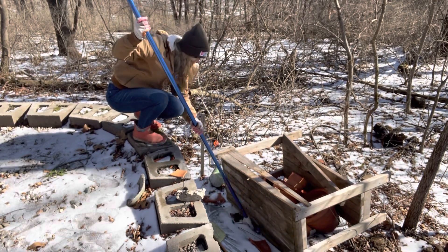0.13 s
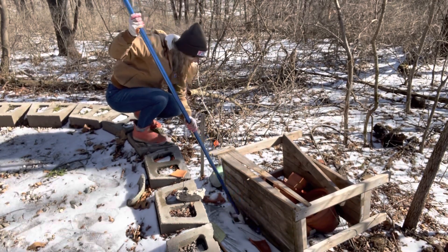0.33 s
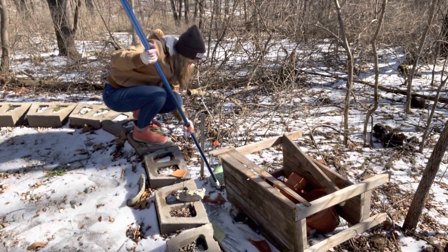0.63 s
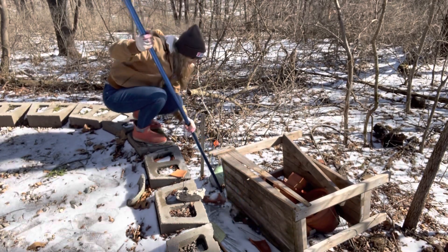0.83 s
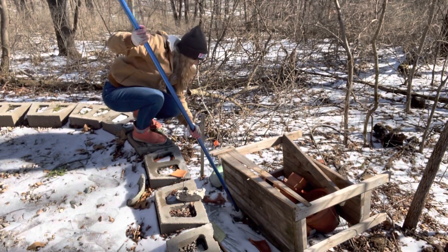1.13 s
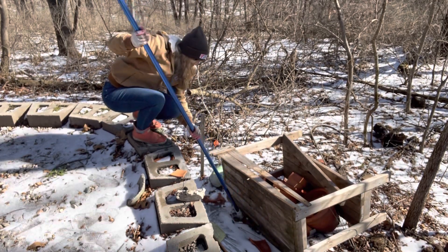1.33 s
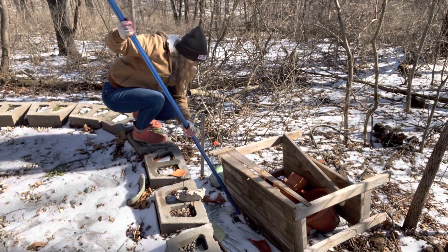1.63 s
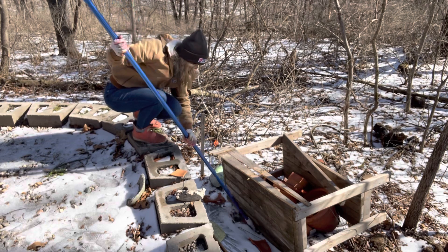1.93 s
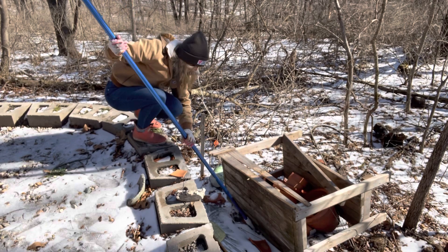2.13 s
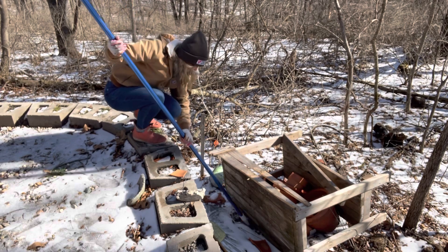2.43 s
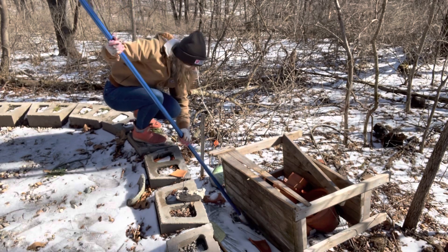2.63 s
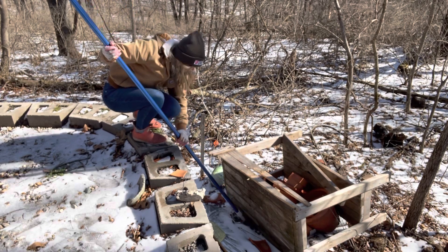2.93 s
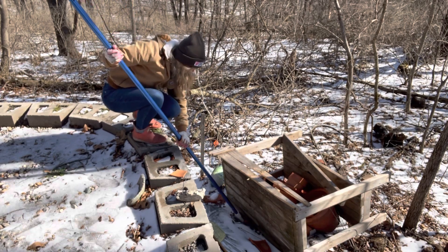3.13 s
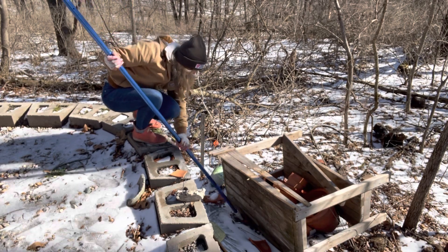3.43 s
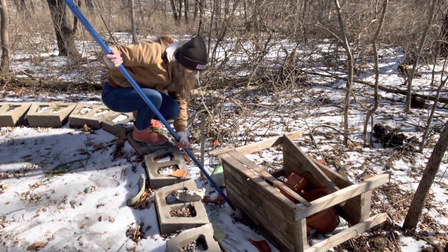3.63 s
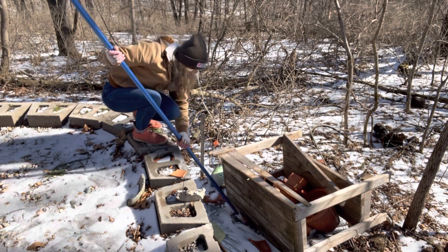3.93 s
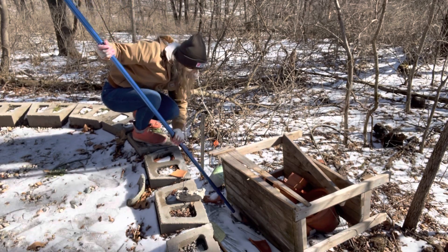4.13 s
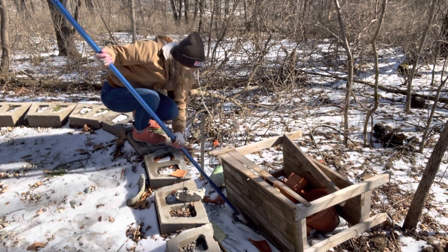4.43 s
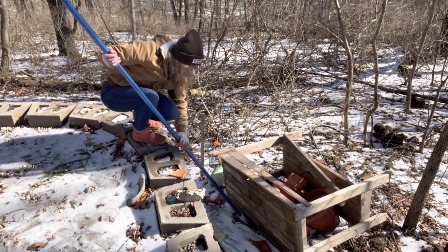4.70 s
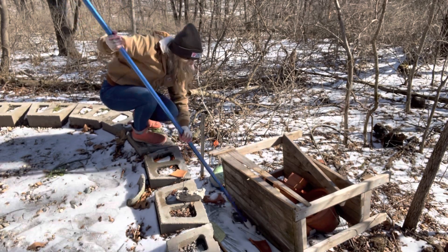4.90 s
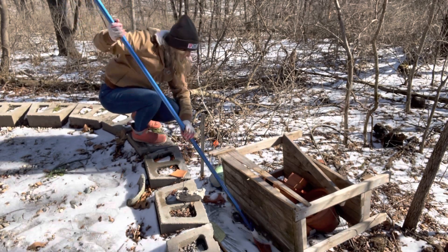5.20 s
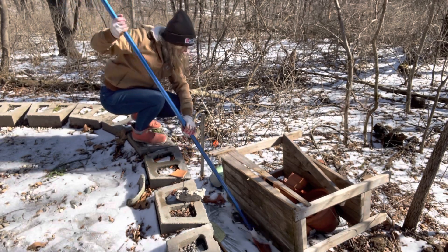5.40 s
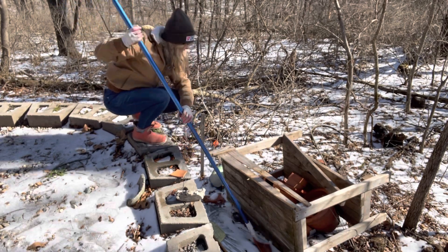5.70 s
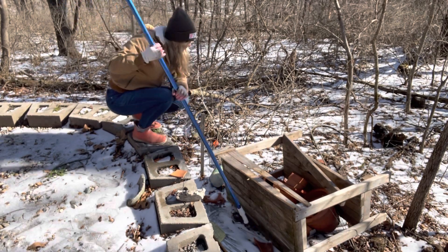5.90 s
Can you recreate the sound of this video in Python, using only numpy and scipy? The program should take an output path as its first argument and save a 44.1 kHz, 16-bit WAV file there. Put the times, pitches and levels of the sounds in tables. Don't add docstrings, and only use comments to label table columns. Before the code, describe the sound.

Terracotta pieces clatter, knock and tick as a long tube pokes them, with short crunchy scrapes, low wind rumble and occasional overloaded hits.

```python
import sys
import numpy as np
from scipy import signal
from scipy.fft import rfft, irfft, next_fast_len
from scipy.io import wavfile
from scipy.ndimage import uniform_filter1d

SR = 44100
rng = np.random.default_rng(int(sys.argv[2]) if len(sys.argv) > 2 else 0)


def wav_out(sig):
    wavfile.write(sys.argv[1], SR, np.round(np.clip(np.atleast_2d(sig).T, -1, 1) * 32767).astype(np.int16))


def nominal_scale(level):
    x = np.asarray(level, float) / 20
    return 10 ** x


N = 267113

# f/Hz, level/dB
AIR_SPECTRUM = [(120, -9), (200, -0.5), (258, -3), (315, -8), (1260, -11.5), (1940, -14), (4830, -24.5),
                (6700, -23), (8500, -39), (11000, -54), (15500, -83)]
# f/Hz, level/dB
AIR_APART = [(200, 0), (5000, 0), (7000, -3), (11000, -20)]
AIR_DB = -41.5

# t/s, level/dB
WIND_STRENGTH = [(0, -31), (.84, -31), (1.16, -31), (1.34, -15), (1.65, -19), (1.77, -10), (1.92, -30.5),
                 (2.04, -17), (2.16, -33), (2.6, -22.5), (2.87, -33.5), (3.26, -36), (3.64, -25.5),
                 (3.8, -41.5), (4.03, -25), (4.33, -31), (4.9, -37.5), (5.2, -30)]
# f/Hz, level/dB
BUFFET_SPECTRUM = [(15, -7), (30, -5.5), (50, 4), (80, 4), (125, 4), (200, -2), (400, -24), (900, -113)]
# f/Hz, level/dB
FLUTTER_SPECTRUM = [(60, -48), (130, 3.5), (200, 4.5), (320, 2), (500, -5.5), (800, -14), (1500, -28),
                    (3000, -45)]
# f/Hz, level/dB
EDDY_SPRAY = [(150, 18), (300, 22.5), (600, -2), (1000, -6), (1600, -96)]
# t/s, peak level/dB, f/Hz, length/cycles
WIND_LUMPS = [(1.266, -8.5, 106, 3.3), (1.296, -3, 90.4, 4.5), (1.385, -9, 78.1, 1.86),
              (1.426, -3.5, 71.6, 2.87), (1.579, -8, 141, 2.83), (1.676, -9.5, 96, 2.2),
              (1.743, 1.5, 78, 1.9), (1.759, 1.5, 135.3, 3.67), (1.8, -3, 151, 4), (1.846, -8, 200, 3.7),
              (1.95, -7, 200, 5.7), (1.984, -4, 285, 2.38), (2.007, -9, 102, 2.3), (2.044, -13, 68, 4.3),
              (2.236, -5.5, 107, 2.6), (2.591, -18.5, 124, 7.2), (3.991, -3, 60, 3.1),
              (4.161, -13, 105, 3.2)]
# t/s, peak level/dB, f/Hz, length/cycles
WIND_POPS = [(1.711, -16, 380, 3.2), (1.733, -16.5, 350, 3.8), (1.76, -12, 420, 2), (1.792, -10, 409, 2.77),
             (1.853, -24, 330, 2.3), (1.926, -20, 447, 3.7), (1.946, -7.5, 388, 1.86),
             (1.963, -12, 407, 2.66), (1.981, -7, 434, 2.1), (2.001, -5, 420, 1.33), (2.025, -16, 510, 2.3),
             (1.581, -20, 296, 3.3), (1.677, -15, 328, 4.3), (1.689, -18, 350, 1.74),
             (2.047, -9.5, 490, 2.35)]
FLUTTER_DB, FLUTTER_SHARE, CALM_DB = -33, 0.032, -17
FLAP_S, FLAP_HALF_S, FLAP_DB = 1.89, 0.12, 10.5

# f/Hz, phase/rad
PORT_PHASE = [(0, 0), (900, -.2), (1900, -.5), (3200, -1.1), (4900, -2.1), (5600, -2.9), (6400, -3.1),
              (7600, -3.3), (9500, -1.6), (10900, -.1), (13700, .1), (15200, 1.6)]
# f/Hz, t60/s
GROUND_T60 = [(200, .05), (1000, .045), (4000, .04), (12000, .03)]
# f/Hz, level/dB
SCATTER_APART = [(150, -12.5), (1000, -3.5), (3000, -1), (5000, 2.5), (7000, 0.5), (9000, 5), (12000, -1.5)]

# t/s, length/s, scrape level/dB, crust fizz level/dB
STROKES = [(0.104, 0.038, -11, -31), (0.276, 0.091, -19, -37), (0.366, 0.031, -53, -27),
           (0.467, 0.21, -59, -48), (0.681, 0.0073, -50, -34), (0.714, 0.049, -23.5, -62),
           (0.823, 0.0069, -16.5, -47), (0.913, 0.035, -17.5, -39), (1.04, 0.013, -10.5, -30.5),
           (1.383, .16, -29, -42), (1.717, 0.0092, -19, -41.5), (1.821, 0.062, -23.5, -38),
           (2.12, 0.048, -51, -57), (2.247, 0.0061, -42, -41.5), (2.407, 0.099, -20, -45.5),
           (2.56, .05, -47, -55.5), (2.796, 0.021, -25.5, -60), (3.115, 0.0082, -13, -44.5),
           (3.392, 0.042, -20.5, -48), (3.43, 0.06, -14.5, -43), (3.524, 0.038, -47, -66),
           (3.739, 0.01, -21, -47), (3.882, 0.031, -14.5, -51), (3.99, 0.23, -63, -68),
           (4.211, 0.074, -20.5, -51), (2.926, 0.014, -33, -63), (4.692, 0.047, -25.5, -56.5),
           (4.801, 0.25, -21.5, -38), (5.103, 0.032, -22.5, -48.5), (5.604, 0.25, -42, -59.5),
           (5.81, 0.13, -30, -61.5), (0.173, 0.092, -29, -69), (0.645, .03, -58, -43),
           (3.585, 0.05, -50, -58), (5.194, 0.12, -33.5, -58), (5.38, 0.13, -38.5, -64),
           (1.567, 0.12, -57, -51), (1.882, 0.016, -14, -54)]
# f/Hz, level/dB
SCRAPE_SPECTRUM = [(200, -44), (500, 13.5), (1000, 5.5), (2000, 1), (3500, -7.5), (5500, -16.5),
                   (7500, -17.5), (10000, -103)]
# f/Hz, level/dB
FIZZ_SPECTRUM = [(1500, -1), (3500, -4), (5500, 1.5), (7500, -0.5), (9500, -3.5), (11500, -5), (14000, -10),
                 (16000, -5)]
DIG_DB_PER_S, LIFT_DB_PER_S = 474, 291
SETTLE_DB, CRUST_SETTLE_DB, SETTLE_DB_PER_S = -11.5, -20.5, 83.5
SCRAPE_REST_DB, FIZZ_REST_DB = -70, -96
CHIP_LOW_HZ, CHIP_HIGH_HZ, CHIP_CYCLES = 450, 6000, 7
DUST_SHARE = .55

# t/s, peak level/dB, f/Hz
SNAPS = [(0.0518, -40, 4240), (0.0972, -21, 4060), (0.1218, -0.5, 3600), (0.2534, -25, 10700),
         (0.6804, -9, 3640), (0.8141, -0.5, 9500), (0.8954, -22, 6130), (0.9119, -14, 5450),
         (0.9842, -16, 11100), (1.0257, -7, 3670), (1.4043, -33, 5100), (1.5065, -19, 11100),
         (1.6362, -21, 11700), (1.7031, -14, 3730), (1.8058, -22, 11700), (2.194, -39, 11400),
         (2.2149, -35, 4270), (2.2428, -37, 5370), (2.3965, -19, 3890), (2.3945, -23, 4350),
         (2.4963, -17, 11800), (2.593, -25, 5460), (2.6345, -36, 3680), (2.7553, -23, 3730),
         (2.767, -32, 3500), (2.7676, -40, 3800), (3.0929, -28, 3480), (3.124, -19, 4180),
         (3.3818, -17, 11500), (3.429, -22.5, 4350), (3.7165, -31, 5040), (3.73, -30, 4080),
         (3.729, -24, 9700), (3.852, -28, 3750), (3.8863, -8, 4180), (4.1306, -29, 4450),
         (4.1929, -33, 3660), (4.235, -18, 4360), (4.4758, -28, 9390), (4.622, -21, 5340),
         (4.627, -13, 3630), (4.7721, -24, 12000), (5.0036, 2.5, 10900), (5.121, -18, 4310)]
# t/s, peak level/dB, f/Hz
SHARP_GRAINS = [
    (2.426, -14, 2200),
    (2.44, -17, 2600),
    (2.4445, -16, 2010),
    (2.455, -18, 2900),
    (2.463, -16, 2430),
    (4.961, -13, 1700),
]
SNAP_T60_S, SNAP_DB = 0.044, -7

# t/s, peak
# level/dB, f/Hz, t60/s
TICKS = [(.295, -17, 1670, 0.017), (.334, -24, 890, 0.032), (.3575, -10.5, 706, 0.028),
         (.373, -19, 2780, 0.026), (.397, -20.5, 1065, 0.076), (.911, -16.5, 1960, 0.041),
         (.912, -9.5, 584, 0.019), (.935, -22, 1756, 0.054), (.99, -28, 1910, 0.033),
         (1.406, -26, 960, 0.031), (1.43, -27, 2670, .03), (1.465, -24, 1130, 0.026),
         (1.714, -20, 2240, 0.014), (1.724, -17, 1580, 0.015), (1.762, -13, 866, 0.019),
         (1.796, -15.5, 1880, 0.0076), (1.808, -29, 1540, 0.017), (1.85, -25, 1130, 0.057),
         (1.892, -19, 1960, 0.019), (1.903, -23, 1060, 0.028), (4.786, -21, 1100, 0.019),
         (4.824, -34, 2150, 0.026), (4.838, -30, 1540, .04), (4.856, -22, 1140, 0.033),
         (4.89, -23, 2600, 0.022), (4.917, -22, 1390, .02), (5.24, -40, 1780, .06),
         (3.887, -6.5, 4410, 0.016), (2.771, -4, 690, 0.077), (2.398, -36, 6150, .2),
         (2.417, -31, 9280, 0.041), (2.418, -31, 11500, .05), (4.9976, 2.5, 1056, .03),
         (5.017, -4, 1113, 0.033), (.681, -24.5, 444, 0.3), (1.028, -6, 2170, 0.067),
         (1.027, -3.5, 612, 0.039), (3.892, -0.5, 780, 0.035), (4.93, -13, 1580, 0.017),
         (1.383, -22, 870, 0.012), (1.733, -29.5, 4750, 0.031), (2.637, -32.5, 1450, 0.037),
         (2.4765, -11, 650, 0.077), (2.486, -14.5, 1013, 0.052), (4.632, 0.5, 684, 0.04),
         (5.675, -35, 2410, 0.028), (5.705, -37, 2260, 0.028), (5.82, -41, 1880, 0.074),
         (5.9, -39, 1170, 0.065), (5.945, -33, 1180, 0.039), (5.952, -36, 1880, .07)]

# t/s, level/dB
RUB_LEVEL = [
    (0.642, -47),
    (.678, -40),
    (0.686, -23.5),
    (.72, -29.5),
    (.75, -31.5),
    (.79, -32),
    (.805, -46),
]
# f/Hz, level/dB
RUB_MODES = [(441, -22), (711, -33), (1254, -31.5), (1500, -42.5), (1615, -42), (1820, -36), (2000, -53),
             (2570, -54), (2940, -42), (3370, -41.5), (3520, -42.5), (3800, -50), (4870, -49), (5850, -50),
             (6420, -52.5)]
RUB_SPLIT_HZ, RUB_PEAK_S, RUB_DULLS_DB_PER_S = 2300, 0.705, 192

# f/Hz, level/dB, share of boom t60
POT_MODES = [(212, -3, 2.2), (258, -7, 0.31), (296, 2, 1.02), (391, -3, 0.95), (479, 8, 0.077)]
# t/s, peak level/dB, f/Hz, t60/s
BOOMS = [(0.122, -16, 480, 1), (0.343, -9.5, 222, 0.024), (0.357, -10.5, 386.5, 0.28),
         (0.808, -30, 488, 0.093), (1.029, -12, 233, 0.35), (1.073, -11, 213, 0.052),
         (2.768, -6, 432, 0.036), (3.087, -1, 383, 0.041), (3.108, -8, 360, 0.35), (3.121, 8, 293, 0.062),
         (3.388, -11, 352, 0.56), (3.43, 0.5, 238, 0.094), (3.584, -11.5, 253, 0.096),
         (3.603, -27, 254, 0.043), (3.755, -13.5, 323, 0.1), (3.858, -16.5, 326, 0.83),
         (3.89, 3.5, 224.6, 0.089), (4.196, -4, 307, 0.033), (4.205, -1, 329, 0.2), (4.221, -1, 206, 0.2),
         (4.233, 4, 417, 0.015), (4.63, 7, 450, 0.045), (5.004, -16.5, 227, 0.23)]
# f/Hz, level/dB, t60/s
CLAY_MODES = [(562, -64, 0.017), (600, -18, 0.043), (665, 1, 0.078), (750, 13.5, 0.011), (1040, 6, 0.011),
              (1130, 23.5, 0.0051), (1257, 2, 0.003), (1394, 9.5, 0.016), (1520, 8, 0.008),
              (1880, 7.5, 0.026), (2107, -7, 0.13), (2600, -17, 0.024)]
# f/Hz, level/dB, t60/s
TUBE_MODES = [(2173, 0, .26), (2160, -3, .26), (1879, -9, .12), (3880, -12, .1), (4662, -14, .07),
              (6045, -8, .17)]
# t/s, level/dB
TUBE_RINGS = [
    (.811, -39),
    (1.025, -29),
    (2.43, -42),
    (3.123, -46),
    (4.628, -44),
]
# f/Hz, level/dB
CRACK_SPECTRUM = [(3000, -40), (6000, 10.5), (8000, -9.5), (11500, 1.5), (15000, -21)]
# f/Hz, level/dB
EDGE_SPECTRUM = [(1200, -68), (2500, 10.5), (4000, 16), (6000, 14), (8000, 8), (11000, 4.5)]
# t/s, level/dB, brightness/dB, main clay f/Hz
CLACKS = [(0.12, 9, -20, 810), (0.275, -15.5, -18, 1070), (0.93, -10, -25, 1740), (1.025, 7.5, -13.5, 845),
          (1.042, 0.5, -15, 907), (1.426, -16, -25, 546), (1.723, -31, -26, 625), (1.794, -24, -24, 557),
          (2.499, -17.5, -18, 680), (2.593, -38.5, 0, 583), (3.218, -20, -49, 2036),
          (4.477, -28.5, -6.5, 1670), (4.626, -0.5, -18, 1410), (4.79, -16.5, -34, 680),
          (4.885, -17.5, -14, 1200), (4.93, -18, -11, 1600), (4.974, -10, -22, 1310),
          (4.9975, -0.5, -14, 1090)]
# t/s, level/dB, brightness/dB, main clay f/Hz
KNOCKS = [(0.098, -19, -5, 755), (0.294, -25, -22, 720), (0.382, -4.5, -20, 1255),
          (0.985, -25.5, -7.5, 740), (1.637, -44, 4.5, 600), (2.047, -36, -50, 570),
          (2.394, -6.5, -17.5, 880), (2.423, -31, -1.5, 620), (2.468, -7, -39, 1080),
          (2.476, -11, -30, 686), (2.763, -1, -21, 1284), (2.788, -18, -21.5, 644), (3.085, -4.5, -45, 600),
          (3.121, -0.5, -20.5, 1050), (3.385, -22.5, -13.5, 980), (3.425, 2, -23, 1230),
          (3.549, -14, -53, 805), (4.232, 6.5, -27, 600), (4.249, -8.5, -28, 1020),
          (4.96, -16.5, -12, 1000), (5.0065, -1.5, -16, 1130)]
# t/s, level/dB, brightness/dB, main clay f/Hz
CLATTERS = [(0.357, -12, -36, 690), (0.81, -3, -17, 596), (0.824, -14, -10, 610), (0.911, -10, -17.5, 600),
            (1.383, -18.5, -40, 805), (1.891, -11, -26, 814), (2.445, -14, -38, 727), (3.443, -3, -23, 590),
            (3.478, -11, -22, 700), (3.602, -20.5, -41, 680), (3.725, -17, -21, 1060),
            (3.853, -19, -22, 544), (3.883, 1.5, -26, 1110), (4.194, -9.5, -29.5, 760),
            (4.644, -11.5, -19.5, 650), (5.0165, -9, -17.5, 1040), (5.048, -12, -17.5, 2260),
            (5.123, -19.5, -15.5, 1880)]
CLACK_T60_S, KNOCK_T60_S, CLATTER_T60_S = 0.032, 0.053, 0.092
CRACK_DB, CRACK_PER_DB = -12, -0.27
LEAD = 512
BLOW_SIZE = 8192


def evened(x):
    return x / np.sqrt(np.mean(x ** 2) + 1e-20)


def peaked(x):
    return x / abs(x).max()


def read(points, hz):
    f, value = np.transpose(points)
    return np.interp(np.log(hz + 1), np.log(f + 1), value)


def add(mix, s, sound):
    part = mix[round(s * SR):][:len(sound)]
    part += sound[:len(part)]


def filtered(x, gain):
    size = next_fast_len(x.shape[-1])
    spectrum = rfft(x, size) * gain(np.fft.rfftfreq(size, 1 / SR))
    return irfft(spectrum, size)[..., :x.shape[-1]]


def coloured(x, shape):
    return filtered(x, lambda hz: nominal_scale(read(shape, hz)))


def ring(modes, detune=1, size=4096):
    hz, db, t60 = np.transpose(modes)[:, :, None]
    t = np.arange(size) / SR
    fade = nominal_scale(db - 60 * t / np.clip(t60, .005, .3))
    return (fade * np.sin(2 * np.pi * hz * detune * t)).sum(0)


def nearby(modes, hz, narrow_db):
    return [(f, d - narrow_db * np.log2(f / hz) ** 2, w) for f, d, w in modes]


def pair(same):
    a, b = rng.standard_normal((2, N))
    same = np.clip(same, 0, 1)
    return np.array([a, same * a + np.sqrt(1 - same ** 2) * b])


def ports(x):
    return filtered(x, lambda hz: np.exp([[.5j], [-.5j]] * read(PORT_PHASE, hz)))


def ground(x):
    taps = rng.standard_normal((2, 6000))
    taps *= (rng.random((2, 6000)) < .25) * (np.arange(6000) > 150)
    hz, t, z = signal.stft(taps, SR, nperseg=128)
    fade = nominal_scale(-60 * t / read(GROUND_T60, hz)[:, None])
    tail = signal.istft(z * fade, SR, nperseg=128)[1]
    return signal.fftconvolve(x[None], tail / np.linalg.norm(tail[0]), axes=1)[:, :N]


def air():
    a, b, c = evened(coloured(rng.standard_normal((3, N)), AIR_SPECTRUM))
    shared = ports(np.array([a, a]))
    return nominal_scale(AIR_DB) * (0.05 * shared + coloured(np.array([b, c]), AIR_APART))


def lumps():
    out = np.zeros((2, N))
    spray = evened(coloured(pair(0.15), EDDY_SPRAY))
    for s, db, hz, cycles in WIND_LUMPS + WIND_POPS:
        turns = np.arange(0, cycles, hz / SR)
        swell = np.sin(np.pi * (turns / cycles) ** 0.6) ** 2
        for ear, edge, (start, lean_db) in zip(out, spray, rng.standard_normal((2, 2))):
            push = np.cos(2 * np.pi * (turns - .5 * cycles + 0.36 * start))
            ragged = 0.0029 * hz * edge[round(s * SR):][:len(turns)]
            add(ear, s, nominal_scale(db + lean_db) * swell * (push + ragged))
    return out


def wind():
    t = np.arange(N) / SR
    buffet = nominal_scale(np.interp(t, *np.transpose(WIND_STRENGTH)))
    gust_db = FLAP_DB * np.exp(-((t - FLAP_S) / FLAP_HALF_S) ** 2)
    flutter = nominal_scale(FLUTTER_DB + gust_db) * (buffet / nominal_scale(CALM_DB)) ** FLUTTER_SHARE
    slow = uniform_filter1d(uniform_filter1d(rng.standard_normal((4, N)), 700), 700)
    puffs = nominal_scale(2.0 * evened(slow))
    low = buffet * evened(puffs[:2] * coloured(pair(0.46), BUFFET_SPECTRUM))
    flap = flutter * evened(puffs[2:] * coloured(pair(0.1), FLUTTER_SPECTRUM))
    return nominal_scale(1.5) * low + nominal_scale(3.5) * flap + lumps()


def strokes(levels_db, settle_db, rest_db):
    t = np.arange(0, N + 64, 64) / SR
    power = nominal_scale(2 * rest_db)
    for (s, length, *_), db in zip(STROKES, levels_db):
        after = np.maximum(t - s - length, 0)
        fall = np.maximum(-LIFT_DB_PER_S * after, settle_db - SETTLE_DB_PER_S * after)
        rise = -DIG_DB_PER_S * np.maximum(s - t, 0)
        power = power + nominal_scale(2 * (db + fall + rise))
    return np.interp(np.arange(N) / SR, t, np.sqrt(power))


def grains(per_s, spread_db, clump_db):
    clumps = nominal_scale(clump_db * evened(uniform_filter1d(rng.standard_normal(N), 300)))
    size = nominal_scale(spread_db * np.minimum(rng.exponential(1, N), 5)) * rng.standard_normal(N)
    return size * (rng.random(N) < per_s / SR) * clumps


def chipped(clicks, count=23):
    out, which = np.zeros(N), np.arange(N) % count
    t = np.arange(1024) / SR
    for k, hz in enumerate(np.geomspace(CHIP_LOW_HZ, CHIP_HIGH_HZ, count)):
        crumb = ring([(hz, 0, CHIP_CYCLES / hz + .004)], size=1024)
        crumb = crumb * np.minimum(t * hz, 1)
        out += signal.oaconvolve(clicks * (which == k), hz ** .75 * evened(crumb))[:N]
    dust = np.sign(clicks) * np.sqrt(abs(clicks))
    return evened(out) + DUST_SHARE * evened(dust)


def grit():
    scrape_db, fizz_db = np.transpose(STROKES)[2:]
    scrape = strokes(scrape_db, SETTLE_DB, SCRAPE_REST_DB)
    fizz = strokes(fizz_db, CRUST_SETTLE_DB, FIZZ_REST_DB)
    low = evened(coloured(chipped(grains(3200, 2.3, 3.5)), SCRAPE_SPECTRUM))
    high = evened(coloured(grains(7000, 2.2, 2.8), FIZZ_SPECTRUM))
    return nominal_scale(-12.0) * scrape * low + nominal_scale(9.5) * fizz * high


def snaps():
    out, fade = np.zeros(N), nominal_scale(-60 * np.arange(1024) / SR / SNAP_T60_S)
    every = SNAPS + SHARP_GRAINS
    for (s, db, hz), luck in zip(every, rng.standard_normal((len(every), 1024))):
        burst = np.pad(luck * fade, (64, 0))
        shape = [(.3 * hz, -30), (.7 * hz, -8), (hz, 0), (1.6 * hz, -9), (21000, -16)]
        add(out, s - 64 / SR, nominal_scale(db + SNAP_DB) * peaked(coloured(burst, shape)))
    return out


def ticks():
    out, soft = np.zeros(N), np.minimum(np.arange(4096) / 40, 1)
    for s, db, hz, t60 in TICKS:
        modes = [(hz, 0, t60), (1.13 * hz, -5, 0.44 * t60), (1.62 * hz, -7, 0.32 * t60)]
        add(out, s, nominal_scale(db) * soft * ring(modes))
    return out


def rub():
    s, db = np.transpose(RUB_LEVEL)
    t = np.arange(s[0], s[-1], 1 / SR)
    blur = [(f, d + 4 * np.log2(f / 1000), 60 / f ** .8) for f, d in RUB_MODES]
    friction = rng.standard_normal(len(t) + 4096)

    def sing(modes):
        return signal.fftconvolve(friction, ring(modes), "valid")[:len(t)]

    low = sing([m for m in blur if m[0] <= RUB_SPLIT_HZ])
    high = sing([m for m in blur if m[0] > RUB_SPLIT_HZ])
    high_db = 8.0 - RUB_DULLS_DB_PER_S * np.maximum(t - RUB_PEAK_S, 0)
    sung = evened(low + high * nominal_scale(high_db)) * signal.windows.tukey(len(t), .1)
    out = np.zeros(N)
    add(out, s[0], nominal_scale(np.interp(t, s, db)) * sung)
    return out


def bending(x, spread=.17):
    hz = np.fft.rfftfreq(len(x), 1 / SR)
    turns = spread * (2 * np.sqrt(hz) - hz / np.sqrt(5000))
    return irfft(rfft(x) * np.exp(-2j * np.pi * turns), len(x))


def rattle(t60, luck):
    t = (np.arange(BLOW_SIZE) - LEAD) / SR
    fade = np.where(t < 0, nominal_scale(4200 * t - 12), nominal_scale(-60 * t / np.clip(t60, .01, .2)))
    size = luck[0] * nominal_scale(6.5 * np.minimum(luck[1] ** 2, 2.8))
    shower = size * (abs(luck[2]) < .06) * fade * 0.14
    shower[LEAD] = 1
    return shower, fade


def boom(db, hz, t60, luck):
    near = nearby(POT_MODES, hz, 5.1) + [(hz, 2.5, 1)]
    modes = [(f, d, share * t60) for f, d, share in near]
    hollow = signal.fftconvolve(rattle(0.041, luck)[0], ring(modes))[:BLOW_SIZE]
    soft = coloured(hollow, [(90, -60), (180, 0), (500, 2), (1200, -16)])
    return nominal_scale(db) * peaked(bending(soft, .11))


def blow(db, edge_db, crack_db, hz, t60, luck):
    shower, fade = rattle(t60, luck)
    near = nearby(CLAY_MODES, hz, 8) + [(hz, 6, .045), (1.2 * hz, 8, .008)]
    detune = 1 + 0.04 * luck[3, :len(near), None]
    clay = signal.fftconvolve(shower, ring(near, detune))[:BLOW_SIZE]
    spread = .15 * np.clip(1 + db / 14, .15, 1) * min(t60 / KNOCK_T60_S, 1) ** 2
    clay = coloured(bending(clay, spread), [(0.05 * hz, -30), (0.58 * hz, 0)])
    edge = coloured(luck[3] * fade + 1.0 * shower, EDGE_SPECTRUM)
    crack = coloured(luck[4] * fade + 0.19 * shower, CRACK_SPECTRUM)
    bright = nominal_scale(edge_db + 7.5) * peaked(edge) + nominal_scale(crack_db + 10.5) * peaked(crack)
    return nominal_scale(db) * (peaked(clay) + bright)


def pole():
    out, taper = np.zeros(N), signal.windows.tukey(BLOW_SIZE, .08)
    kinds = (CLACKS, CLACK_T60_S), (KNOCKS, KNOCK_T60_S), (CLATTERS, CLATTER_T60_S)
    blows = sorted((s, db, bright_db, bright_db + CRACK_DB + CRACK_PER_DB * db, hz, t60)
                   for rows, t60 in kinds for s, db, bright_db, hz in rows)
    for table, strike in (blows, blow), (BOOMS, boom):
        for s, *how in table:
            luck = rng.standard_normal((5, BLOW_SIZE))
            add(out, s - LEAD / SR, taper * strike(*how, luck))
    for s, db in TUBE_RINGS:
        add(out, s, nominal_scale(db) * ring(TUBE_MODES, size=12000))
    return out


def scene():
    blows, crunch, drag = pole() + ticks(), grit(), rub()
    scatter = coloured(ground(0.94 * blows + 0.3 * crunch + drag), SCATTER_APART)
    direct = (blows + crunch) * nominal_scale(np.array([[-.8], [.8]]))
    return ports(direct + scatter) + drag + wind() + air() + ports(snaps())


def band_limit(x):
    return signal.sosfilt(signal.butter(12, 15750, fs=SR, output="sos"), x)


def record(dry):
    clipped = np.clip(dry, -1.05, 1.05)
    mix = coloured(clipped, [(15, -30), (45, 0), (15600, 0), (16000, -30)])
    return band_limit(mix)


dry = scene()
out = record(dry)
wav_out(out)
```